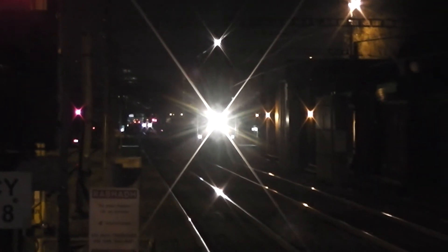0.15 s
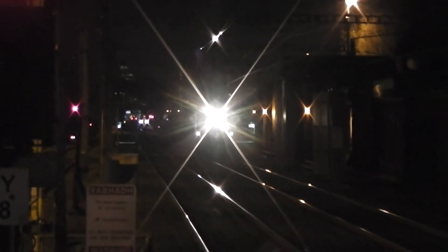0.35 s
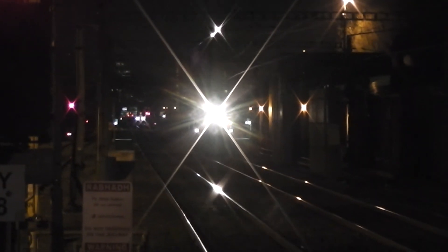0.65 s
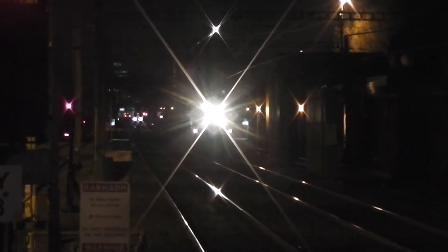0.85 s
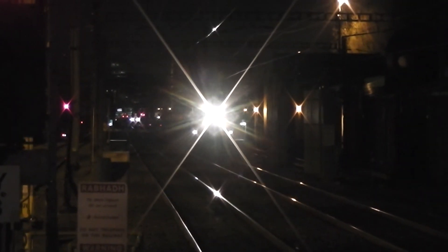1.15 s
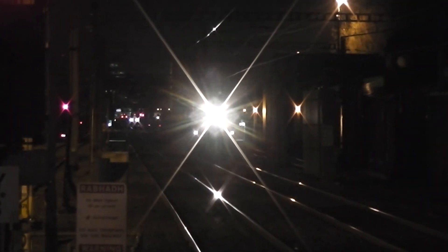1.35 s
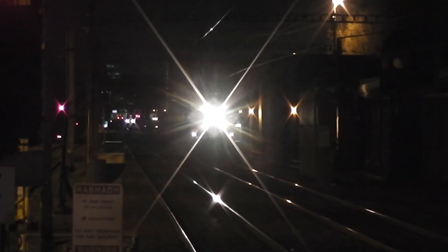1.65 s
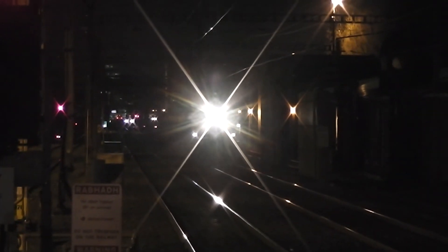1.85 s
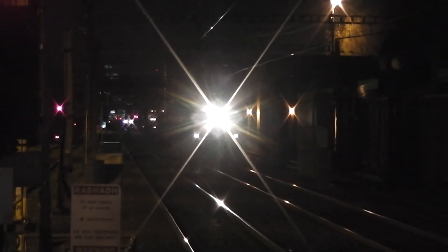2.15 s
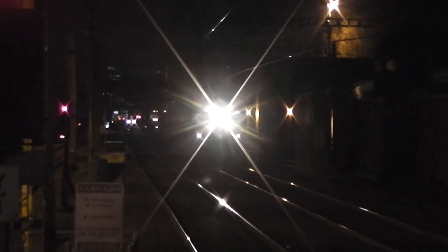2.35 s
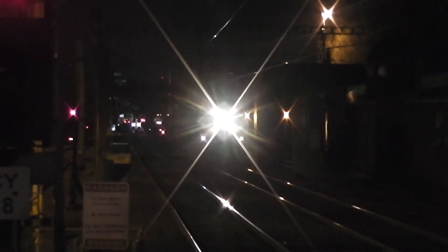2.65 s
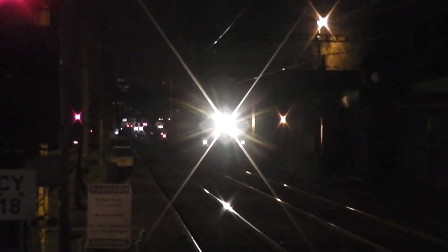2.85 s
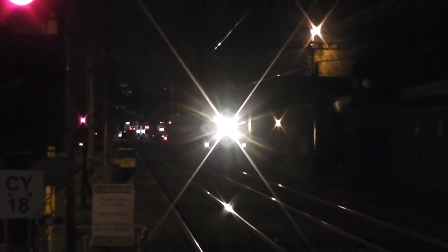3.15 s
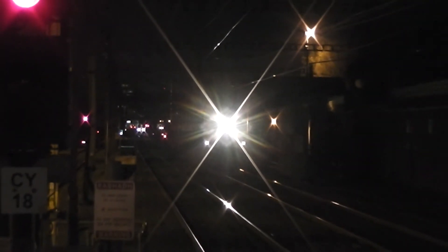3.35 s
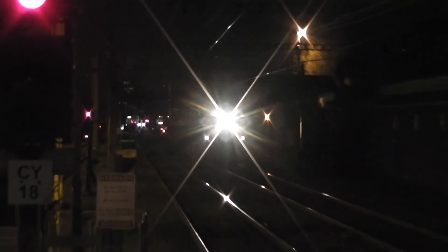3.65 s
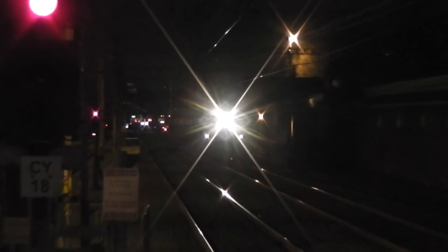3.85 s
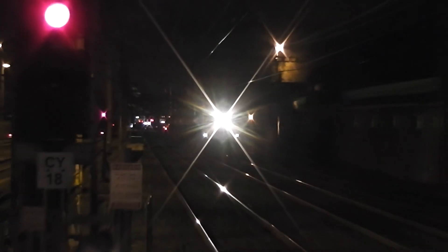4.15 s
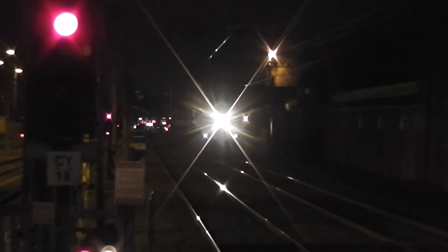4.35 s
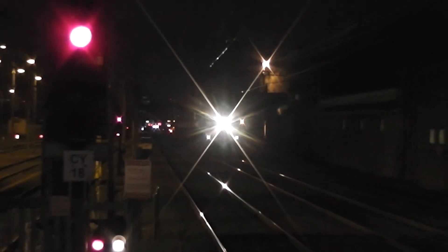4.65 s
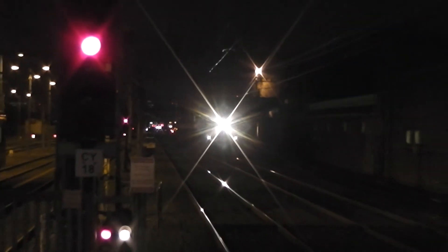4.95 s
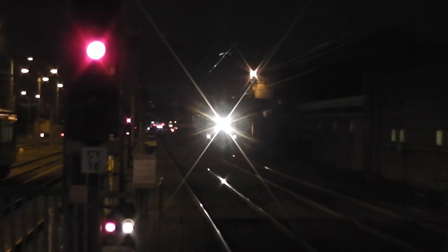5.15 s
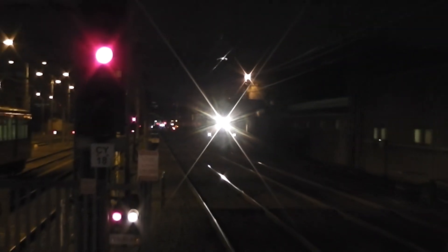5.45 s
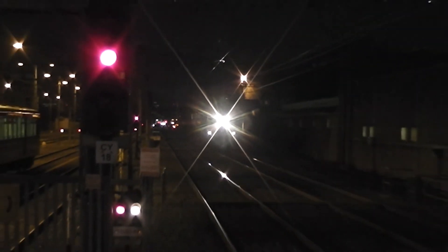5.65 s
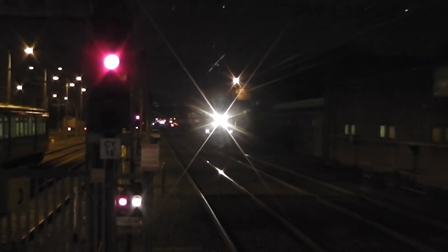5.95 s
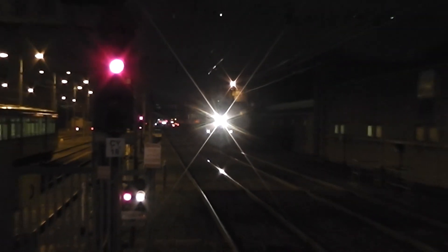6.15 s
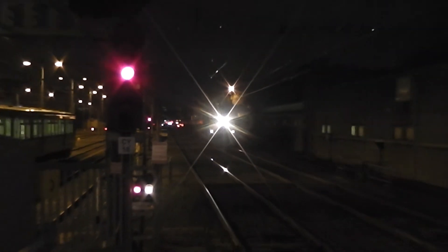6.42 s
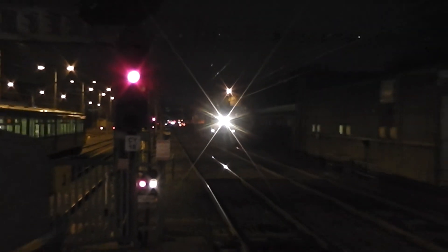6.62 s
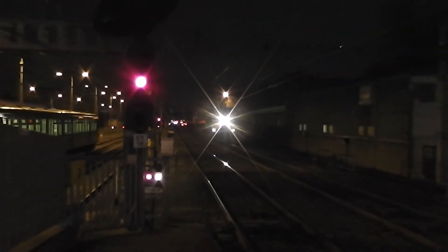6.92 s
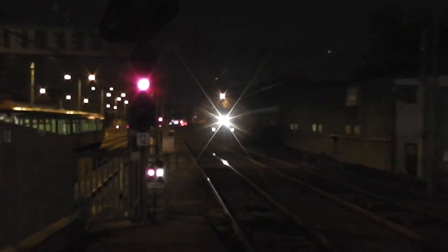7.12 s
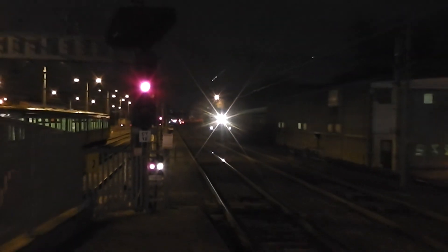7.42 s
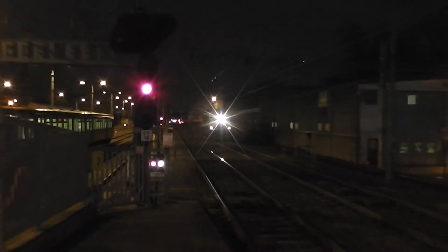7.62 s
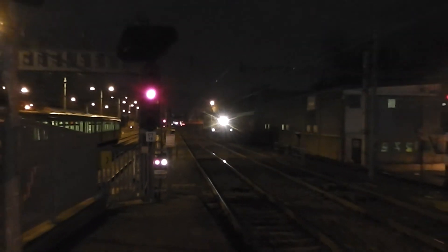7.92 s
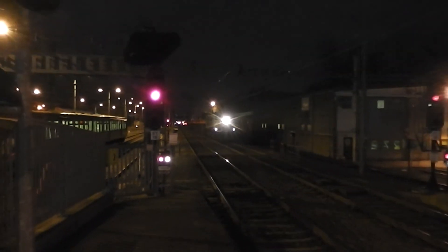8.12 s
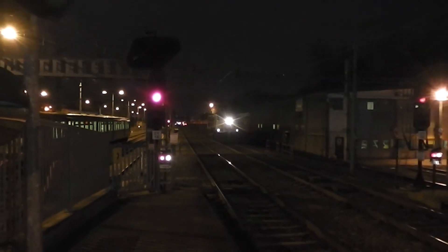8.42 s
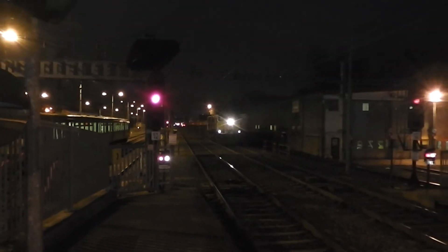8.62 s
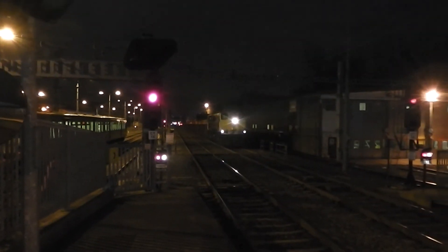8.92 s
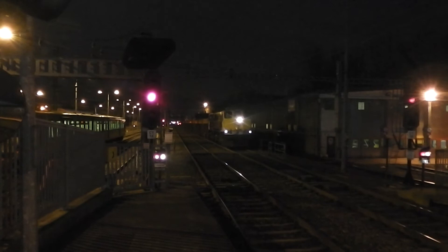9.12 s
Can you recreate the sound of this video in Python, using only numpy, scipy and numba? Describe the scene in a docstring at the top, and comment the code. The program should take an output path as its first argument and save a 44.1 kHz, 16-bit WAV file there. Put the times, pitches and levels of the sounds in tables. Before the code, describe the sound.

Heavy engine drone with fast pulsing throb and wavering mechanical whines swells as a diesel train approaches, two tiny squeaks passing midway.

```python
"""A diesel locomotive under load draws nearer: its exhaust drones on orders of the crank turn, throbbing
once a turn over a roar of noise and wavering whines, of which a few flare in the first 2.5 s.
Two short squeaks come near 5 s, the panels drum harder around 6.35 s, and whines flare again from 4.5 s.
The treble opens all the while; the lowest orders swell after 6.5 s, peak at 8.6 s and sink by the end.
Exhaust and squeaks are sines, whines are tones with narrow noise, the rest is shaped noise;
a limiter cuts and ticks on the loudest peaks, mostly in the later, louder part."""
import sys
import numpy as np
from scipy import signal
from scipy.fft import irfft
from scipy.io import wavfile
from scipy.ndimage import uniform_filter1d
from numba import njit

SR = 44100
rng = np.random.default_rng(int(sys.argv[2]) if len(sys.argv) > 2 else 0)


def inscribe(sig):
    """Save sig as 16-bit PCM at rate SR to the path in sys.argv[1].

    A 1-D sig is mono; a 2-D sig holds one channel per row.
    Samples are clipped to [-1, 1] before scaling.
    """
    pcm = np.round(np.clip(np.atleast_2d(sig).T, -1, 1) * 32767)
    wavfile.write(sys.argv[1], SR, pcm.astype(np.int16))


N = 409248
FRAME, HOP = 1024, 256  # samples, short-time spectra

# How near the train is. Each row: time in seconds, share 0-1.
NEARNESS = [(0, 0.37), (1.5, 0.41), (3, 0.58), (4.5, 0.65), (6, 0.75), (7, 0.87), (8, 0.92), (8.7, 1),
            (9.28, 1)]


def gain_of(db):
    """Amplitude factor of a level in dB."""
    return 10 ** (np.asarray(db) / 20)


def evened(x):
    """Scales to rms 1."""
    return x / np.sqrt(np.mean(x ** 2) + 1e-20)


def read(points, hz):
    """Spectrum table read on a log-frequency axis."""
    f, value = np.transpose(points)
    return np.interp(np.log(hz + 1), np.log(f + 1), value)


def closed(points, hz):
    """Like read, but -120 dB beyond the ends of the table."""
    outside = (hz < points[0][0]) | (hz > points[-1][0])
    return np.where(outside, -120, read(points, hz))


def columns(rows, t):
    """Columns of a time table, interpolated at the times t."""
    s, *values = np.transpose(rows)
    return np.array([np.interp(t, s, v) for v in values])


def drift(t, top_hz):
    """Slow random curve of rms 1: 20 sines up to top_hz, the slower the stronger."""
    rates_hz = np.geomspace(top_hz / 20, top_hz, 20)
    return evened(sum(np.sin(2 * np.pi * (f * t + rng.random())) / np.sqrt(f) for f in rates_hz))


def noise(field_db, patchy_db, alike=True):
    """Stereo noise of rms 1: random spectra under a bins x frames level field, with drifting patches."""
    # Left-right likeness. Each row: frequency in Hz, likeness 0-1.
    likeness = [(25, .965), (60, .99), (130, 1), (290, .99), (640, .98), (1400, .93), (2800, .94),
                (5000, .82), (8000, .5), (15000, .5)]
    # Stereo balance. Each row: frequency in Hz, left over right in dB.
    balance = [(25, 1.1), (60, 1.3), (700, 1.4), (1300, 2), (2600, .6), (5000, .2), (8000, 2.5),
               (13000, -1)]
    # Phase between the two microphone ports. Each row: frequency in Hz, lead of left in radians.
    port_lead = [(0, 0), (3800, 0), (5300, -.2), (6700, .1), (7700, 1.2), (8200, 1), (9100, -.9),
                 (9700, -1.2), (11000, -.1), (15200, 0)]
    hz = np.fft.rfftfreq(FRAME, 1 / SR)
    a, b, c, d, patches = rng.standard_normal((field_db.shape[1], len(hz), 5), dtype=np.float32).T
    patches = uniform_filter1d(patches, size=14, axis=1)
    patches = evened(uniform_filter1d(patches, size=10, axis=0))
    same = np.clip(read(likeness, hz), 0, 1)[:, None] * alike
    lag = np.exp(-1j * np.interp(hz, *np.transpose(port_lead)))[:, None]
    left = a + 1j * b
    right = same * lag * left + np.sqrt(1 - same ** 2) * (c + 1j * d)
    balance_db = np.multiply.outer([.5, -.5], read(balance, hz))[:, :, None]
    z = np.array([left, right]) * gain_of(field_db + patchy_db * patches + balance_db)
    return evened(signal.istft(z, nperseg=FRAME, noverlap=FRAME - HOP)[1][:, :N])


def per_frame(db):
    """Removes each frame's total power from a level field, leaving its colour."""
    return db - 10 * np.log10(np.mean(gain_of(db) ** 2, axis=0))


def rumble(hz, t):
    """Low rumble: noise of fixed colour."""
    # Rumble spectrum. Each row: frequency in Hz, relative density in dB per Hz.
    spectrum = [(15, -20), (25, -4.5), (45, 0.5), (80, 1.5), (130, -1.5), (200, -5.5), (260, -22.5)]
    return noise(closed(spectrum, hz)[:, None] + 0 * t, patchy_db=1.1)


def muffler_body(hz, t):
    """Ringing muffler body: noise in a fixed band."""
    # Body spectrum. Each row: frequency in Hz, relative density in dB per Hz.
    spectrum = [(150, -31.5), (190, -1.5), (250, 3), (295, 2.5), (340, -25.5)]
    return noise(closed(spectrum, hz)[:, None] + 0 * t, patchy_db=1.1)


def panels(hz, t):
    """Drumming panels: noise in a fixed band whose level wanders and swells once."""
    # Panel spectrum. Each row: frequency in Hz, relative density in dB per Hz.
    spectrum = [(560, -33.5), (670, 1), (780, 0.5), (880, -1), (980, -19.5)]
    # The swell: middle in seconds, half-width to 1/e of its dB in seconds, rise in dB.
    at_s, width_s, swell_db = (6.35, .35, 3.6)
    now = np.arange(N) / SR
    level_db = -6 + 2.9 * np.interp(now, t, drift(t, 1.4))  # against the roar
    level_db += swell_db * np.exp(-((now - at_s) / width_s) ** 2)
    return gain_of(level_db) * noise(closed(spectrum, hz)[:, None] + 0 * t, patchy_db=1.1)


def treble_hiss(hz, t, near, swell):
    """Treble noise blending from a far to a near colour, as air takes less treble."""
    # Far hiss spectrum. Each row: frequency in Hz, relative density in dB per Hz.
    far_hiss = [(1180, -33.5), (2000, -10), (2430, -19), (2810, -2.5), (2950, -5), (3010, -7), (4530, -7.5),
                (6570, -27), (7220, -34.5), (9000, -56), (11700, -74.5), (19800, -120)]
    # Near hiss spectrum. Each row: frequency in Hz, relative density in dB per Hz.
    near_hiss = [(1200, -40.5), (2000, -7), (2600, -7.5), (4180, -2), (5400, -7), (8900, -19.5),
                 (11000, -30), (13300, -33), (14000, -40.5), (15700, -57)]
    far_db = np.where(hz > far_hiss[-1][0], -110, closed(far_hiss, hz))
    blend_db = (1 - near) * far_db[:, None] + near * closed(near_hiss, hz)[:, None]
    flicker_db = 0.55 * swell + near * .8 * drift(t, 13.0)
    return noise(per_frame(blend_db) + flicker_db, patchy_db=1.03)


def roar(hz, near, swell):
    """Roar of fans, wheels and wagons: noise whose low end fills in as the train nears."""
    # Roar spectrum. Each row: frequency in Hz, relative density in dB per Hz.
    spectrum = [(290, -31.5), (330, -8.5), (420, -8), (560, -4.5), (700, -7), (900, -1.5), (1170, -1.5),
                (1470, -7.5), (1740, -5.5), (2100, -13), (2600, -22), (3400, -41.5)]
    # Wheel noise under the roar when near. Each row: frequency in Hz, gain in dB.
    wheel_gain = [(300, 8), (600, 6), (900, 2.5)]
    colour_db = closed(spectrum, hz)[:, None] + near * read(wheel_gain, hz)[:, None]
    return noise(per_frame(colour_db) + 0.49 * swell, patchy_db=0.72)


def whines():
    """Generator, gear and blower whines, and a low hum on the third crank order: a narrow band of noise about
    each pitch, over a steady tone."""
    # Pitch of each whine in Hz.
    pitches_hz = [47.64, 283.6, 364, 567, 690, 755.4, 851, 1134, 1200.8, 1255, 2553, 2833, 3117]
    # Each row: half-width in Hz to exp(-2) of the amplitude, level far and near in dB against the roar.
    whine_rows = [(1, -12, -28), (2.93, -10, -11.5), (4, -23.5, -15.5), (4, -24.5, -13), (5, -19.5, -13.5),
                  (3.05, -9, -17.5), (4, -13, -15), (4.95, -25.5, -13.5), (1.2, -11.5, -23),
                  (4.1, -27.5, -29.5), (14.1, -30.5, -33), (14.9, -27, -31), (22, -33, -33)]
    # Brief rises of a whine. Each row: middle in seconds, whine index, length in seconds, gain in dB.
    flares = [(.15, 11, .16, 15), (.63, 11, .1, 5), (.95, 11, 0.2, 10), (1.32, 11, 0.16, 9),
              (1.55, 11, 0.08, 10), (2.22, 11, .16, 13), (2.26, 12, .24, 10), (2.296, 10, .16, 10),
              (2.4, 11, .22, 7), (4.7, 7, .4, 9), (5.902, 10, .12, 7.5), (6.103, 5, 3.9, 8),
              (6.4, 6, 0.88, 12), (7, 6, .5, 7), (7, 3, .6, 7), (7.6, 6, .5, 5), (8.298, 10, .3, 10.5),
              (8.5, 4, 1.4, 5), (8.68, 3, .4, 3.5), (8.696, 6, 0.83, 8.5)]
    steady = .8  # power share of the plain tone
    t, hz = np.arange(N) / SR, np.fft.rfftfreq(N, 1 / SR)
    near = columns(NEARNESS, t)[0]
    flare_db = np.zeros((len(whine_rows), N))
    for s, k, length_s, db in flares:
        flare_db[round(k)] += db * np.cos(np.pi * np.clip((t - s) / length_s, -.5, .5)) ** 2
    out = np.zeros(N)
    for f, (width_hz, far_db, near_db), up_db in zip(pitches_hz, whine_rows, flare_db):
        band = np.exp(-2 * ((hz - f) / width_hz) ** 2 + 2j * np.pi * rng.random(len(hz)))
        wavering = np.sqrt(1 - steady) * evened(irfft(band, N))
        core = np.sqrt(2 * steady) * np.cos(2 * np.pi * (f * t + rng.random()))
        out += gain_of(far_db + near * (near_db - far_db) + up_db) * (core + wavering)
    return out


def running_noise(turns):
    """Mixes the noises and whines; each crank turn puffs the roar and hiss."""
    # Levels. Each row: time in seconds, roar in dB, low rumble in dB,
    # then against the roar: treble hiss in dB, muffler body in dB.
    approach = [(0, -24.5, -40, -14, -1.5), (.8, -25, -32.5, -14.5, 0), (1.5, -23.5, -34, -13, -6),
                (2, -23, -32, -14.5, 0), (2.3, -22, -33, -12.5, -1.5), (3, -22, -29.5, -13.5, -2.5),
                (3.8, -20.5, -29, -14.5, -8), (4.6, -20.5, -27, -14, -5.5), (5.3, -20, -33.5, -14.5, -5.5),
                (5.9, -19.5, -24, -12.5, -3), (6.5, -18.5, -27, -13, -6), (7.2, -16, -36.5, -11.5, -6.5),
                (7.7, -20, -39, -12, -8), (8.3, -18, -39.5, -10, -3), (8.8, -19, -27, -10, -10.5),
                (9.28, -18.5, -31.5, -10.5, -5)]
    t, hz = np.arange(N // HOP + 5) * HOP / SR, np.fft.rfftfreq(FRAME, 1 / SR)
    near = np.clip(columns(NEARNESS, t), 0, 1)
    swell = drift(t, 9.)
    roar_db, rumble_db, hiss_db, body_db = columns(approach, np.arange(N) / SR)
    puff = gain_of(.55 * np.cos(2 * np.pi * turns + .8))
    mix = puff * roar(hz, near, swell)
    mix += gain_of(hiss_db) * puff * treble_hiss(hz, t, near, swell)
    mix += gain_of(body_db) * muffler_body(hz, t)
    mix += panels(hz, t)
    mix += whines() * gain_of([[.75], [-.75]])  # left, right
    return gain_of(roar_db) * mix + gain_of(rumble_db) * rumble(hz, t)


def squeaks():
    """Short sine tones that swell and fade."""
    # Each row: middle in seconds, pitch in Hz, length in seconds, peak in dB before the stereo lean.
    squeak_rows = [(4.98, 3460, 0.046, -38), (5.11, 4490, 0.029, -30.5)]
    out = np.zeros(N)
    for s, hz, length_s, db in squeak_rows:
        t = np.arange(round(length_s * SR)) / SR
        at = round((s - length_s / 2) * SR)
        tone = np.sin(2 * np.pi * (hz * t + rng.random()))
        out[at:at + len(t)] += gain_of(db) * np.hanning(len(t)) * tone
    return out


def order_lead_rad(k, close):
    """Phase lead of order k: bent, as the pipe delays low orders more, and shifted close by."""
    low_bend = 1 + .4 * close if k < 9 else 1  # close by, low orders trail further
    lead = .5 * low_bend * (k - 9) ** 2
    lead += 2.1 * (k - np.clip(k, 8, 10))  # orders outside the pipe resonance skip its ringing delay
    lead -= .7 * (k < 8)
    return lead + .35 * close * (k - 9)  # close by, the throb comes earlier


def exhaust(turns):
    """Exhaust drone: sines on orders of the crank turn, whose neighbours beat once a turn."""
    # The two strongest orders swell apart as the path changes.
    # Each row: time in seconds, order 9 in dB, order 10 in dB against order 9.
    pipe = [(0, -18, -0.5), (.7, -17.5, 0.5), (1.5, -14, -5), (2.6, -15.5, -2), (3.1, -15.5, 0),
            (4, -11.5, -2.5), (4.6, -13.5, -1), (5.3, -12.5, -2), (6, -13, -0.5), (6.7, -10.5, 0.5),
            (7.1, -9, -1), (7.5, -10, -3), (7.9, -11, -6.5), (8.4, -13, -2), (8.75, -13, -0.5),
            (9.05, -8, -5.5), (9.28, -12, -4)]
    # Low orders, which grow only close by. Each row: order, level far and close in dB against order 9.
    low_orders = [(5, -32, -25), (6, -22, -7), (7, -17.5, -4), (8, -10, -6)]
    # Higher orders. Each row: order, level in dB against order 10.
    weak_orders = [(11, -9.5), (12, -17.5), (13, -23), (14, -24.5), (15, -16.5), (16, -17.5), (17, -23)]
    # The last stretch, where the bass arrives. Each row: time in seconds, share 0-1.
    closeness = [(0, 0.1), (6.5, 0), (7.5, 0.47), (8.1, .7), (8.6, 0.99), (9.28, 0.12)]
    t = np.arange(N) / SR
    ninth_db, tenth_db = columns(pipe, t)
    close = np.clip(columns(closeness, t)[0], 0, 1)
    orders = [(9, 0), (10, tenth_db)]
    orders += [(round(k), far + close * (near - far)) for k, far, near in low_orders]
    orders += [(round(k), tenth_db + db) for k, db in weak_orders]
    out = np.zeros(N)
    for k, db in orders:
        depth = 2.5 + db / -9.5  # weaker orders waver more
        level_db = .5 * depth * np.interp(t, t[::HOP], drift(t[::HOP], 5.))
        waver_rad = .054 * depth * np.interp(t, t[::HOP], drift(t[::HOP], 5.))
        phase = 2 * np.pi * k * turns + order_lead_rad(k, close) + waver_rad
        out += gain_of(ninth_db + db + level_db) * np.sqrt(2) * np.cos(phase)
    return out


def scene():
    """Crank turns drive the exhaust and the puffs of the running noise."""
    # Crank speed. Each row: time in seconds, turns a second.
    crank = [(0, 15.845), (1.9, 15.845), (2.1, 15.873), (4.4, 15.875), (4.6, 15.892), (6.5, 15.895),
             (9.28, 15.922)]
    first_throb_s = .014
    t = np.arange(N) / SR
    turns = np.cumsum(columns(crank, t)[0]) / SR - first_throb_s * crank[0][1]
    noises = running_noise(turns)
    return (exhaust(turns) + squeaks()) * gain_of([[.7], [-.7]]) + noises  # left, right


@njit
def limiter_cut(peak, ceiling, step_db, sink_db, sink, recover_db):
    """Gain cut in dB: a peak over the ceiling steps it up at once and starts a further sink; it then eases off."""
    cut, owed, out = 0., 0., np.zeros(len(peak))
    for n in range(len(peak)):
        if peak[n] * 10 ** (-cut / 20) > ceiling:
            cut += step_db
            owed = sink_db
        cut = max(cut + sink * owed - recover_db, 0.)
        owed *= 1 - sink
        out[n] = cut
    return out


def record(dry):
    """Stepped limiter, whose steps tick on the loudest crests; microphone hiss; clipping; band limit."""
    # Microphone hiss spectrum. Each row: frequency in Hz, relative density in dB per Hz.
    mic_spectrum = [(4120, -26.5), (7000, -2.5), (8300, -0.5), (12000, -0.5), (15100, -1), (15600, 1)]
    mic_hiss_db, edge_hz = -63, 15750
    sink_s, recover_db_per_s = .006, 32.
    cut_db = limiter_cut(abs(dry).max(0), ceiling=1.005, step_db=.5, sink_db=1.4,
                         sink=1 / (sink_s * SR), recover_db=recover_db_per_s / SR)
    hz = np.fft.rfftfreq(FRAME, 1 / SR)
    field_db = closed(mic_spectrum, hz)[:, None] + np.zeros(N // HOP + 5)
    mic_hiss = noise(field_db, patchy_db=2.0, alike=False)
    limited = dry / gain_of(cut_db) + gain_of(mic_hiss_db) * mic_hiss
    held = np.clip(limited, -.995, .995)  # what slips past the limiter clips
    edge = signal.firwin(511, edge_hz, window=("kaiser", 9), fs=SR)
    return signal.oaconvolve(held, edge[None], "same")


dry = scene()
out = record(dry)
inscribe(out)
```